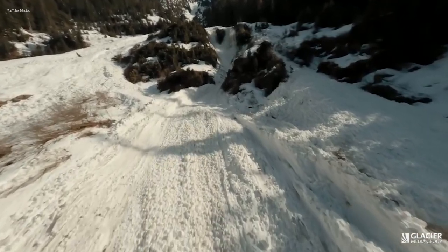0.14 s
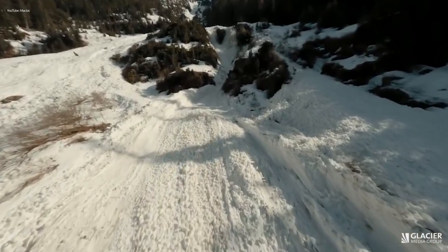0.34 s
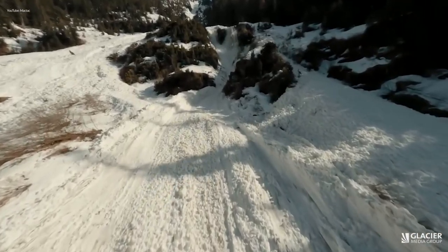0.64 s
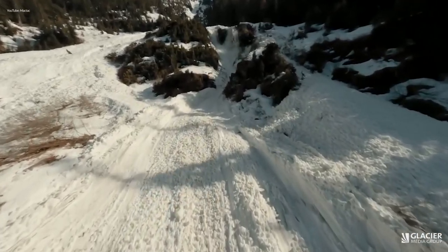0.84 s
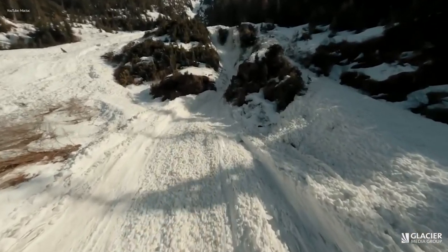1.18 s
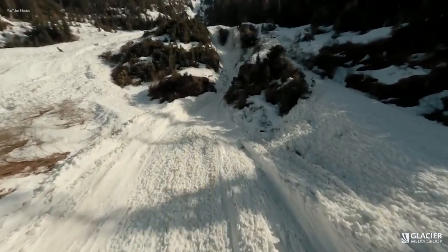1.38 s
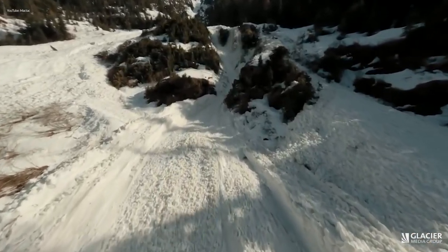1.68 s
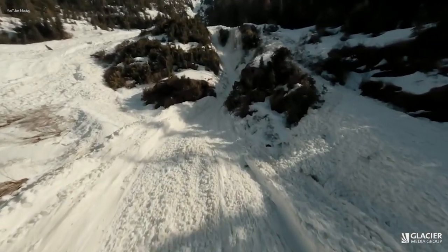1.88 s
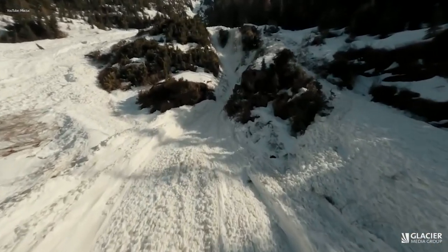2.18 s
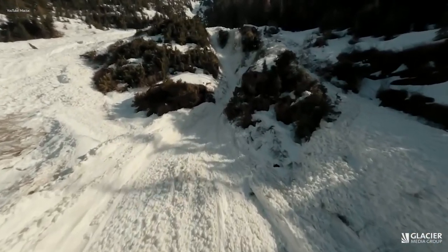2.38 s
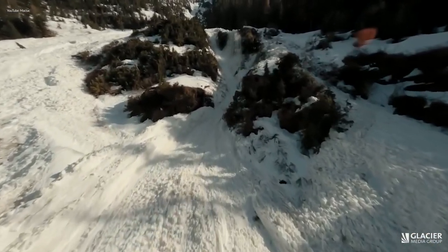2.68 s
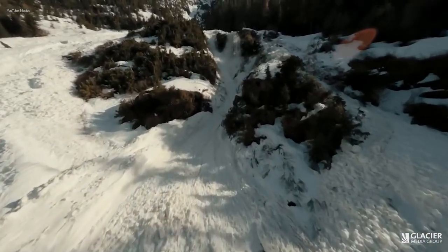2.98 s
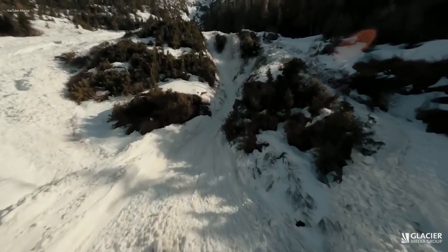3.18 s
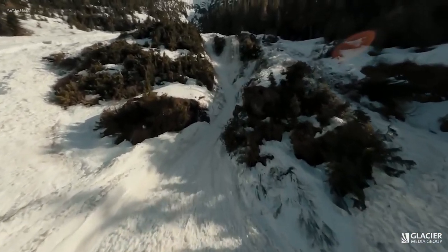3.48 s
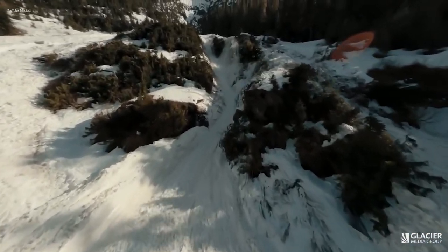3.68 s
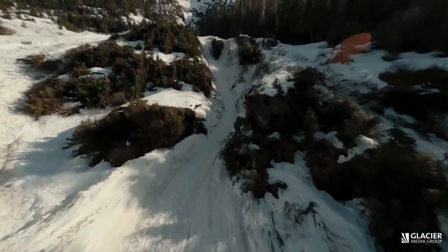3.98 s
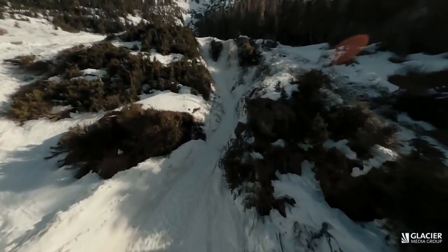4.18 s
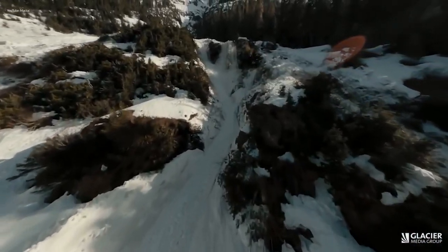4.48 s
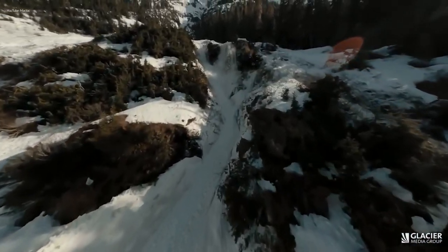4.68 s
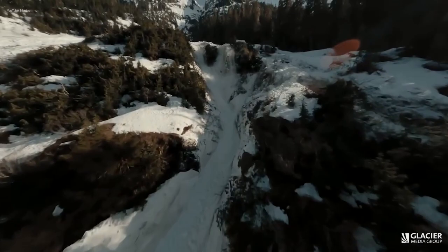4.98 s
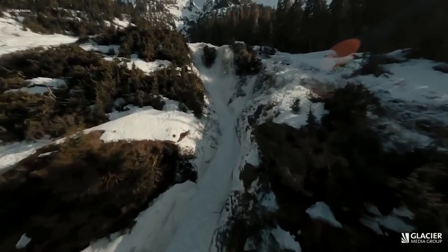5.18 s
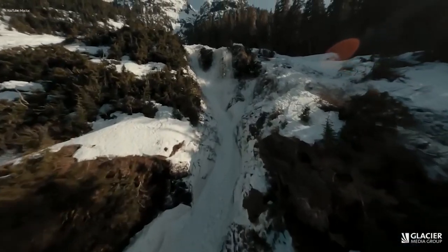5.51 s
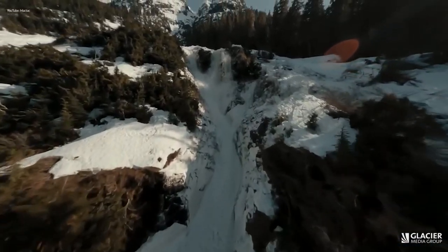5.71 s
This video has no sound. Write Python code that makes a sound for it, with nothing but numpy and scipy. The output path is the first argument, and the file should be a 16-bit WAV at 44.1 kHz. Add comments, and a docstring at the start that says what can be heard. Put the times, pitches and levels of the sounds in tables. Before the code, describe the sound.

Very deep rolling rumble fills both ears from the start, strongest in the first few seconds. Over it, packed snow grinds and tumbles in dense, dull crunches, surging in bursts, with single lumps cracking slightly left. Faint crystal dust patters far right, drifting toward the middle. Bass slowly thins while the crunch continues to the cut. Open air, close wide stereo, overloaded low end.

```python
"""Snow slide in a gully

Snow pours down a mountain gully: a deep ground rumble of filtered noise with a steady low boom in it,
the crunch of tumbling clods made of dense tiny impacts, single clods breaking as short noise bursts,
slabs swishing past as narrow gliding bands, and a fine hissing spray of snow dust to the right.
The bass overloads the recorder, which flattens the highest crests."""
import sys
import numpy as np
from scipy import signal
from scipy.fft import rfft, irfft
from scipy.io import wavfile
from scipy.ndimage import uniform_filter1d

SR = 44100
rng = np.random.default_rng(int(sys.argv[2]) if len(sys.argv) > 2 else 0)


def digitize_waveform(pressure):
    """Quantize a signal to 16-bit integers and store it at the path in sys.argv[1].

    Rows of a 2-D input are taken as channels; values are limited to [-1, 1].
    """
    field = np.atleast_2d(pressure).T
    bounded = np.clip(field, -1, 1)
    quanta = np.round(bounded * 32767).astype(np.int16)
    wavfile.write(sys.argv[1], SR, quanta)


def boost(x):
    """Linear amplitude factor 10**(x/20) for a level x in decibels (scalar or array-like)."""
    u = np.asarray(x, float) / 20
    return 10 ** u


N = 257984


def evened(x):
    """Power normalisation: scales to rms 1."""
    return x / np.sqrt(np.mean(x ** 2) + 1e-20)


def read(points, hz):
    """Spectral envelope: interpolates a spectrum table along log frequency."""
    f, value = np.transpose(points)
    return np.interp(np.log(hz + 1), np.log(f + 1), value)


def columns(rows, t):
    """Temporal envelopes: interpolates the columns of a curve table at times t."""
    s, *rest = np.transpose(rows)
    return [np.interp(t, s, c) for c in rest]


def sides(pan_db):
    """Constant-power panning: left and right gains for a level difference, positive to the left."""
    left = 1 / (1 + boost(-2 * np.asarray(pan_db)))
    return np.sqrt(2 * np.array([left, 1 - left]))


def coloured(gain):
    """Spectral filtering: steady white noise weighted by an amplitude for every frequency bin."""
    return irfft(rfft(rng.standard_normal(N)) * gain, N)


def drift(length):
    """Slow fluctuation: twice-smoothed noise of rms 1 that holds for about length samples."""
    once = uniform_filter1d(rng.standard_normal(N), int(length))
    return evened(uniform_filter1d(once, int(length)))


def steadied(x, length_s, share):
    """Envelope compression: irons out a share of the slow chance swelling of a noise."""
    length = int(length_s * SR)
    power = uniform_filter1d(uniform_filter1d(x ** 2, length), length)
    return x * (np.mean(x ** 2) / abs(power)) ** (share / 2)


def swelling(steady_db, events):
    """Incoherent addition: short swells add their power to that of a steady level."""
    t, power = np.arange(N) / SR, boost(2 * steady_db)
    for peak_s, length_s, db in events:
        rise_s = 0.39 * length_s
        at = slice(max(int((peak_s - length_s) * SR), 0), int((peak_s + length_s) * SR))
        corners_s = [peak_s - rise_s, peak_s, peak_s - rise_s + length_s]
        power[at] += boost(2 * db) * np.interp(t[at], corners_s, [0, 1, 0]) ** 2
    return np.sqrt(power)


def grains(per_s, scatter_db, surge_db, surge_length, wash, alike):
    """Shot noise: tiny impacts of scattered size surge over an even wash, partly shared by both ears."""
    scatter = np.minimum(rng.exponential(1, (3, N)), 5)
    size = boost(scatter_db * scatter) * rng.choice([-1., 1.], (3, N))
    hits = evened(size * (rng.random((3, N)) < per_s / SR))
    hits += wash * rng.standard_normal((3, N))
    both = np.sqrt(alike) * hits[0] + np.sqrt(1 - alike) * hits[1:]
    return evened(both * boost(surge_db * drift(surge_length)))


def shaped(x, field_db, band_hz, patchy_db):
    """Time-varying filtering: a moving spectrum with random patches, scaled for unit power in band_hz."""
    frame, hop = 256, 64
    hz, t, z = signal.stft(x, SR, nperseg=frame, noverlap=frame - hop)
    patches = uniform_filter1d(rng.standard_normal(z.shape[1:]), 2, 0)
    patches = evened(uniform_filter1d(patches, 18, 1))
    colour_db = field_db(hz[:, None], t)
    inside = (hz > band_hz[0]) & (hz < band_hz[1])
    power = (boost(colour_db)[..., inside, :] ** 2).sum(-2).mean(0) / len(hz)
    z = z * boost(colour_db + patchy_db * patches) / np.sqrt(power)
    return signal.istft(z, SR, nperseg=frame, noverlap=frame - hop)[1][:, :N]


# Weight of the slide; the last three columns are extra levels of the deepest shudder, the upper body
# and the left-right spread: time_s, level_db, shudder_db, body_db, spread_db
FLOW = [(0.0, -21.5, 0, 1.5, 5), (0.75, -16.5, -3.5, -4.5, -0.5), (1.2, -22.5, -1.5, 3, -1.5),
        (1.7, -18, -1.5, -0.5, -3), (2.2, -23.5, 4, 2, 1.5), (2.8, -19.5, -4.5, 0, -4.5),
        (3.3, -20.5, 3.5, 0.5, -5.5), (3.7, -22.5, 0, 1, -2), (4.4, -23.5, -5, 1, -1),
        (5.0, -26, 3, 1.5, 2.5), (5.5, -24.5, -9, 0, 1), (5.85, -31, -1, 3.5, 8.5)]
# Rumble heard alike on both sides, a relative spectrum: frequency_hz, density_db (per Hz)
RUMBLE = [(4, -4), (13, -1.5), (26, -2), (33, -4), (46, 0.5), (58, -9), (78, -7), (110, -11.5),
          (200, -23.5), (400, -35), (900, -52.5), (3000, -75.5), (6000, -110)]
# Left-right difference of the rumble, on the same scale: frequency_hz, density_db (per Hz)
SPREAD = [(5, -48), (27, -18.5), (40, -11), (70, -9.5), (92, -17), (210, -34), (400, -52.5), (900, -53.5),
          (3000, -80), (6000, -115)]
# Heaves, where the deep rumble rolls up and sags again: peak_s, length_s, level_db
HEAVES = [(0.113, 0.13, -15.5), (0.26, 0.2, -16.5), (0.388, 0.19, -22), (0.725, 0.25, -19.5),
          (0.93, 0.068, -25), (1.33, 0.31, -21.5), (1.62, 0.11, -20), (1.876, 0.058, -18),
          (2.17, 0.23, -20), (2.342, 0.11, -17), (2.692, 0.23, -25), (2.938, 0.19, -25), (3.3, 0.17, -24),
          (3.646, 0.13, -26.5), (4.17, 0.19, -19.5), (4.428, 0.31, -23.5), (4.71, 0.28, -22),
          (4.92, 0.29, -22)]


def rumble():
    """Forced ground vibration: the moving mass shakes the ground; the deepest part swells on its own."""
    shudder_hz, body_hz, edge_hz = 31.4, 124.5, 184
    t = np.arange(N) / SR
    level_db, shudder_db, body_db, spread_db = columns(FLOW, t)
    hz = np.fft.rfftfreq(N, 1 / SR)
    middle, spread = boost(read(RUMBLE, hz)), boost(read(SPREAD, hz))
    unit = np.sqrt((middle[(hz > 55) & (hz < 400)] ** 2).sum() / len(hz))
    deep = 1 / (1 + (hz / shudder_hz) ** 6)
    low = 1 / (1 + (hz / body_hz) ** 6)
    centre = boost(shudder_db) * coloured(middle * deep) + coloured(middle * (low - deep))
    centre = steadied(centre, length_s=.07, share=.6)
    centre *= swelling(level_db - 1.0, HEAVES) / boost(level_db)
    # the upper edge thins out first as the slide eases: 1.5 dB per s from 3.97 s on
    fade_db = -1.5 * np.maximum(t - 3.97, 0)
    upper = (1 - low) * (1 - 1 / (1 + (hz / edge_hz) ** 6))
    below_edge = np.sqrt((1 - low) ** 2 - upper ** 2)
    centre += boost(body_db) * coloured(middle * below_edge)
    centre += boost(body_db + fade_db) * coloured(middle * upper)
    across = coloured(spread * low) + boost(body_db) * coloured(spread * (1 - low))
    across *= boost(spread_db)
    lumps = boost(1.64 * drift(980) + 0.39 * drift(4600))  # heavy blocks land unevenly
    return boost(level_db) * lumps / unit * np.array([centre + across, centre - across])


# Low boom, level before the gains of the two ears: time_s, level_db
BOOM = [(0.0, -16.5), (1.1, -19), (1.3, -28), (1.5, -18), (3.5, -19), (4.4, -22.5), (5.0, -26), (5.85, -30)]
# Weaker, looser hums, level relative to the boom before the ear gains;
# the width is from the centre to half amplitude: pitch_hz, width_hz, level_db
BOOM_PARTNERS = [(49, 0.7, -9.0), (64, 3.0, -11.0)]


def boom():
    """Interference of near tones: a wavering hum, opposite in the two ears, beats with looser neighbours."""
    level_db, = columns(BOOM, np.arange(N) / SR)
    pitch_hz = 43.5 + 0.6 * drift(9800)
    tone = np.sqrt(2) * np.sin(2 * np.pi * (np.cumsum(pitch_hz) / SR + rng.random()))
    tone *= boost(0.63 * drift(4400))
    bins = np.fft.rfftfreq(N, 1 / SR)
    partners = np.zeros(N)
    for f, width, db in BOOM_PARTNERS:
        resonance = 1 / (1 + ((bins - f) / width) ** 2)
        partners += boost(db) * evened(coloured(resonance))
    left, right = 1.1 * tone + 1.3 * partners, -0.9 * tone - 0.7 * partners
    return boost(level_db) * np.array([left, right])


# Steady grinding of the clods: time_s, level_db, brightness_db (per octave), left_right_db
TUMBLE = [(0.0, -70, 4, -12), (0.07, -57.5, 1, -8), (0.16, -45.5, -5, 6), (0.2, -46, 2, -1),
          (0.6, -47, 1, -3), (0.8, -49.5, 1, 0), (0.91, -47.5, 1.5, 1.5), (0.95, -42, 4.5, -4),
          (1.1, -45, 2, -1), (1.17, -43.5, 2, -3), (1.42, -37.5, 3.5, 5), (1.75, -43, 4.5, -1),
          (2.15, -42.5, 4, 1), (2.21, -48.5, 3, -3.5), (2.44, -48.5, 2.5, -3), (2.58, -40, 5, 0),
          (2.96, -41.5, 2.5, -1), (3.24, -41.5, 2.5, 5), (3.57, -39.5, 1.5, -2.5), (3.93, -38.5, 1.2, 12),
          (4.24, -39.5, 3, -3.5), (4.7, -44, 0.5, 4), (5.85, -44, 1.4, 2)]
# Colour of the crunch, a relative spectrum, also used for the clods: frequency_hz, density_db (per Hz)
CRUNCH = [(150, -13.5), (500, 5.5), (1100, 2.5), (2050, -2.5), (2700, -9), (3400, -20.5), (4400, -36.5),
          (9000, -57.5), (15000, -62.5)]
# Left-right lean of the crunch by frequency: frequency_hz, left_right_db
LEAN = [(300, -27.5), (720, -0.5), (1400, 1.5), (2200, 2.5), (4000, 2)]
# Surges, where a heap of clods comes down at once: peak_s, length_s, level_db
SURGES = [(0.277, 0.16, -40), (0.461, 0.1, -40), (0.69, 0.055, -38.5), (0.725, 0.082, -38),
          (0.86, 0.085, -40.5), (0.968, 0.073, -40.5), (1.03, 0.21, -41.5), (1.124, 0.025, -35.5),
          (1.672, 0.16, -37), (1.796, 0.077, -38.5), (2.119, 0.15, -38.5), (2.318, 0.033, -39),
          (2.479, 0.054, -34), (2.695, 0.22, -40), (3.01, 0.059, -37.5), (3.135, 0.022, -36),
          (3.216, 0.13, -35), (3.309, 0.12, -38.5), (4.409, 0.097, -41), (5.205, 0.31, -41.5),
          (5.38, 0.12, -40.5), (5.792, 0.17, -42)]


def tumble():
    """Superposed impacts with absorption: clods grind and knock; packed snow swallows their treble."""
    def field_db(hz, t):
        """Spectral tilt: crunch colour tilted about 1300 Hz by the brightness, leaning left in the treble."""
        octaves = np.log2(np.clip(hz, 300, 5000) / 1300)
        tilted = read(CRUNCH, hz) + columns(TUMBLE, t)[1] * octaves
        return tilted + np.array([.5, -.5])[:, None, None] * read(LEAN, hz)

    level_db, _, pan_db = columns(TUMBLE, np.arange(N) / SR)
    impacts = grains(per_s=2500, scatter_db=2.25, surge_db=2.0, surge_length=210, wash=0.93, alike=0.9)
    crunch = shaped(impacts, field_db, (700, 3000), patchy_db=1.6)
    return swelling(level_db, SURGES) * sides(pan_db) * crunch


# Big clods breaking, peak level before panning: start_s, level_db, centre_hz, left_right_db
CLODS = [(0.184, -31, 720, 1), (0.206, -31.5, 2060, 4), (0.256, -21, 886, -2), (0.288, -29.5, 1190, -1),
         (0.328, -35, 2483, -7), (0.391, -27.5, 1110, -4), (0.464, -38, 1790, -0.5), (0.481, -26, 1510, -4),
         (0.668, -31.5, 1400, 4), (0.682, -29, 813, -2), (0.707, -34.5, 1400, 3), (0.797, -43.5, 888, 3),
         (0.851, -27.5, 1010, 4), (0.925, -26, 680, 2), (0.952, -28.5, 1860, 4), (0.974, -27.5, 1030, 1),
         (1.113, -21.5, 1060, 2), (1.162, -30, 824, -2), (1.192, -30, 875, 0.5), (1.429, -29, 1170, 11),
         (1.487, -39, 2600, 3.5), (1.574, -25.5, 1230, 4.5), (1.634, -28, 1510, -3), (1.709, -28, 703, -1),
         (1.793, -25, 800, 4), (1.922, -26, 873, 4), (2.127, -39, 2400, 1), (2.158, -34, 2000, -5),
         (2.246, -36, 1500, -1), (2.364, -33.5, 1227, -5), (2.425, -34, 1853, 3), (2.475, -25.5, 1177, 4),
         (2.577, -25.5, 1740, 2), (2.621, -27.5, 2000, 2), (2.678, -36, 1540, 6), (2.835, -28, 2000, 0),
         (2.999, -24.5, 930, -1.5), (3.102, -19.5, 1140, 3), (3.111, -28, 1300, 7),
         (3.125, -21.5, 1165, 5.5), (3.248, -28.5, 1130, 8), (3.391, -25, 1060, 2), (3.451, -29, 737, -4.5),
         (3.512, -28.5, 2263, 2.5), (3.594, -34, 1260, 9), (3.761, -24.5, 1820, 5), (3.916, -43, 1235, 16),
         (3.953, -34.5, 2900, 0), (4.024, -25.5, 1260, 5), (4.102, -30, 1940, 2), (4.209, -35, 1070, 0.5),
         (4.399, -34, 2580, 2), (4.593, -32.5, 1530, 4), (4.745, -26.5, 720, 4), (4.974, -29.5, 1010, 3),
         (5.152, -33, 800, 3), (5.223, -39, 1200, 10), (5.252, -27, 686, 5.5), (5.372, -31, 1140, 9)]


def clods():
    """Damped fracture: each break is a brief bright crack, then a short dull burst around its own pitch."""
    attack_s, dull_t60_s, crack_t60_s = 0.0018, 0.06, 0.015
    out, t = np.zeros((2, N)), np.arange(2048) / SR
    hz = np.fft.rfftfreq(len(t), 1 / SR)
    for s, db, centre_hz, pan_db in CLODS:
        noise = rfft(rng.standard_normal((2, len(t))))
        octaves = np.log2((hz + 1) / centre_hz)
        hump_db = read(CRUNCH, hz) - 9 * octaves ** 2
        crack_db = read(CRUNCH, hz) + 6 * octaves
        burst = evened(irfft(noise[0] * boost(hump_db))) * boost(-60 * t / dull_t60_s)
        # the crack starts 9 dB below the dull burst
        burst += evened(irfft(noise[1] * boost(crack_db))) * boost(-9 - 60 * t / crack_t60_s)
        burst *= 1 - np.exp(-t / attack_s)
        burst /= abs(burst).max()
        part = out[:, round(s * SR):][:, :len(t)]
        part += (boost(db) * sides(pan_db)[:, None] * burst)[:, :part.shape[1]]
    return out


# Sliding slabs, level before the swell and fade:
# start_s, length_s, start_hz, end_hz, level_db, left_right_db
SWISHES = [(2.557, 0.074, 1750, 1970, -45.5, 0), (2.87, 0.12, 2180, 2170, -41, -1),
           (3.741, 0.075, 1991, 1876, -38, 6), (3.898, 0.057, 1214, 1305, -43, -1),
           (3.968, 0.071, 2100, 2040, -50, 5), (4.094, 0.159, 1974, 2017, -41, 1.5),
           (4.892, 0.09, 2537, 2380, -50, -1), (5.169, 0.071, 1898, 1960, -42.5, 6)]


def swishes():
    """Modulated narrow-band noise: a slab glides past as a breathy band that drifts, swells and fades."""
    width_hz = 300
    out, smooth = np.zeros((2, N)), signal.butter(2, width_hz / 2, fs=SR)
    for s, length_s, start_hz, end_hz, db, pan_db in SWISHES:
        slow = signal.lfilter(*smooth, rng.standard_normal((2, SR // 2)))
        a, b = slow[:, 1000:1000 + int(length_s * SR)]  # skips the filter's start-up
        u = np.linspace(0, 1, len(a))
        phase = 2 * np.pi * np.cumsum(start_hz + (end_hz - start_hz) * u) / SR
        band = evened(a * np.cos(phase) + b * np.sin(phase)) * np.sin(np.pi * u)
        out[:, round(s * SR):][:, :len(a)] += boost(db) * sides(pan_db)[:, None] * band
    return out


# Snow dust drifting from far right towards the middle: time_s, level_db, left_right_db
SPRAY = [(0.0, -65, -35), (0.4, -61, -34), (0.5, -65, -23), (1.2, -67.5, -20), (1.45, -71, -19),
         (1.9, -65.5, -14), (2.16, -65, -18), (2.24, -69.5, -25), (2.55, -63.5, -24), (3.2, -64, -17.5),
         (3.8, -59, -19.5), (4.06, -65.5, -24), (4.14, -61.5, -20), (4.45, -59, -21), (4.9, -61.5, -13),
         (5.3, -58, -7.5), (5.85, -62.5, -5)]
# Colour of the dust, a relative spectrum: frequency_hz, density_db (per Hz)
HISS = [(800, 4), (2500, -4.5), (4000, -6), (7000, -9.5), (9000, -13), (11000, -18), (13000, -25),
        (15500, -27)]
# Puffs of dust thrown up: peak_s, length_s, level_db
PUFFS = [(0.06, 0.18, -60), (0.336, 0.12, -64), (0.566, 0.17, -64), (0.773, 0.067, -69),
         (0.829, 0.029, -62.5), (0.938, 0.02, -67.5), (1.088, 0.15, -66), (1.72, 0.055, -64),
         (1.788, 0.054, -65), (1.917, 0.036, -64.5), (2.099, 0.028, -58), (3.1, 0.015, -55),
         (3.125, 0.034, -63.5), (3.448, 0.094, -59.5), (3.725, 0.073, -58), (4.367, 0.054, -59.5),
         (4.445, 0.078, -57), (5.037, 0.18, -57.5), (5.24, 0.057, -52.5), (5.538, 0.071, -59),
         (5.717, 0.23, -59)]


def spray():
    """Shot noise of many light impacts: fine crystals patter and hiss close by."""
    def field_db(hz, t):
        """Stationary spectrum: the same hiss colour at all times."""
        return (read(HISS, hz) + 0 * t)[None]

    level_db, pan_db = columns(SPRAY, np.arange(N) / SR)
    patter = grains(per_s=2500, scatter_db=3.1, surge_db=1.2, surge_length=370, wash=0.9, alike=0.0)
    dust = shaped(patter, field_db, (4500, 12000), patchy_db=1.5)
    level_db += 0.75 * drift(2200)  # the dust comes in gusts
    return swelling(level_db, PUFFS) * sides(pan_db) * dust


def scene():
    """Linear superposition: the sum of all layers of the slide."""
    return rumble() + boom() + tumble() + clods() + swishes() + spray()


def top_cut(x):
    """Nothing passes above the cut-off."""
    return signal.sosfilt(signal.butter(12, 15720, fs=SR, output="sos"), x)


def record(dry):
    """Amplitude saturation: the loudest bass crests are squashed against the ceiling."""
    ceiling, knee = 0.575, 14.0  # full scale is 1; a higher knee bends more sharply
    flattened = dry / (1 + abs(dry / ceiling) ** knee) ** (1 / knee)
    return top_cut(flattened)


dry = scene()
out = record(dry)
digitize_waveform(out)
```